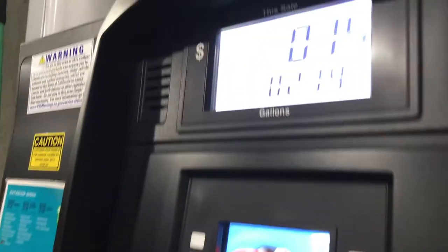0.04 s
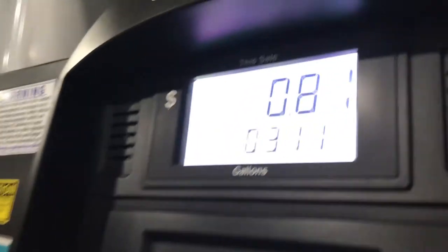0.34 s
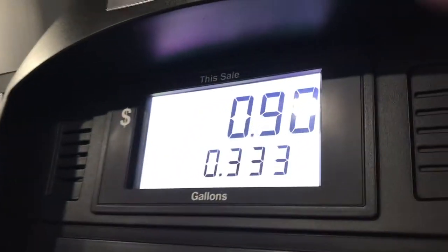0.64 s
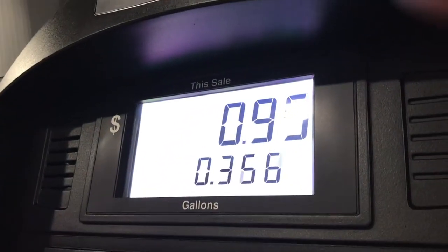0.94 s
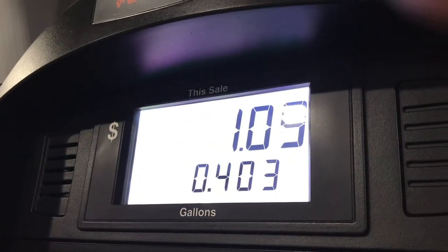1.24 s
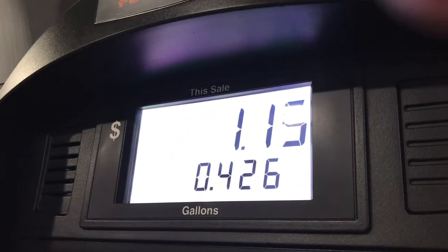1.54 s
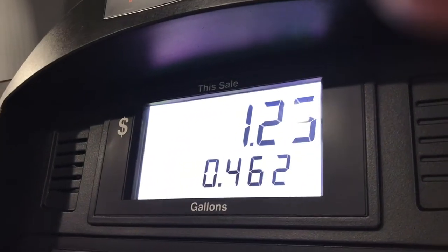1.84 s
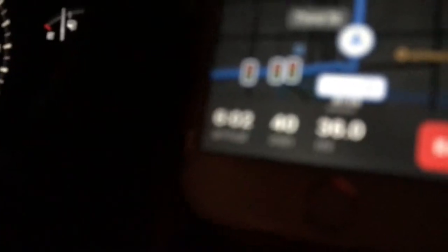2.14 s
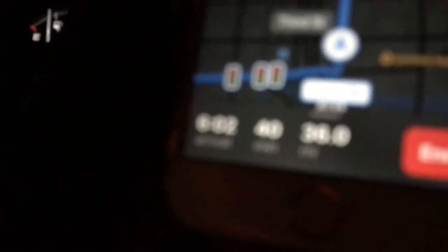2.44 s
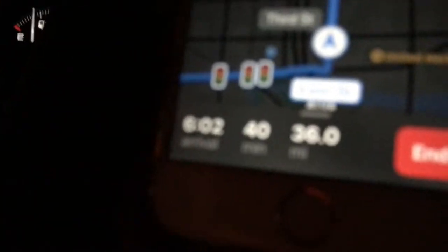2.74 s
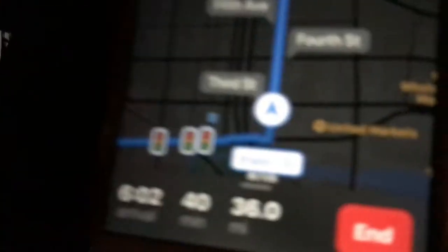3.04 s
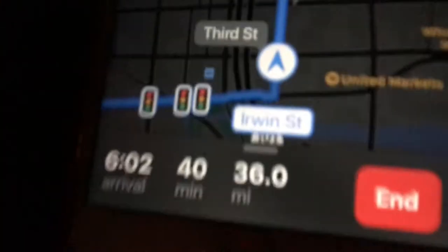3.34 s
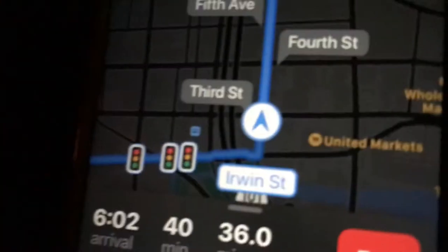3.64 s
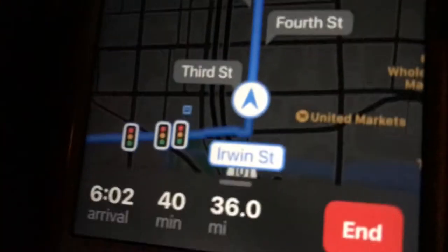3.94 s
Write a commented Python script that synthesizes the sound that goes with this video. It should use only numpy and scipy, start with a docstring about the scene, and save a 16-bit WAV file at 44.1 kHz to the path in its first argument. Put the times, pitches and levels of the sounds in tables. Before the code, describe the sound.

Engines rumble and tyres hiss around a humming pump at a fuel station. The sound cuts to a deep idle drone inside a car, where plastic clicks four times and cloth rustles nearby in two strokes with dull bumps.

```python
"""On a fuel station forecourt, a pump hums under the rumble and tyre noise of traffic, while a louder
vehicle fades and a sleeve brushes by. Then the scene changes to the inside of an idling car.
The engine's firing makes a deep drone, and a small plastic part snaps and rings four times.
Cloth slides in long soft strokes, its fibres catching and slipping, and a hand makes dull knocks."""
import sys
import numpy as np
from scipy import signal
from scipy.fft import rfft, irfft
from scipy.io import wavfile
from scipy.ndimage import uniform_filter1d

SR = 44100
rng = np.random.default_rng(int(sys.argv[2]) if len(sys.argv) > 2 else 0)


def persist_wave(psi):
    """Save psi, clipped to +-1, as 16-bit WAV."""
    counts = np.round(np.clip(psi, -1, 1) * 32767).astype(np.int16)
    wavfile.write(sys.argv[1], SR, np.atleast_2d(counts).T)


N = 176400
T = np.arange(N) / SR
FREQS = np.arange(N // 2 + 1) * SR / N   # the frequencies of a spectrum, in Hz


def from_db(db):
    """Turn decibels into a number to multiply by."""
    return 10 ** (np.asarray(db) / 20)


def rms_one(x):
    """Scale a sound so that its average strength (rms) is 1."""
    return x / np.sqrt(np.mean(x ** 2) + 1e-20)


def level(rows):
    """A loudness curve through points of (time [s], level [dB])."""
    return from_db(np.interp(T, *np.transpose(rows)))


def colour(x, spectrum):
    """Shape a sound by (frequency [Hz], level [dB]) rows, falling steeply past the ends; strength 1."""
    hz, db = np.transpose(spectrum)
    octave, known = np.log2(FREQS + 1e-3), np.log2(hz)
    octaves_outside = np.abs(octave - np.clip(octave, known[0], known[-1]))
    gain = from_db(np.interp(octave, known, db) - 36 * octaves_outside)
    return rms_one(irfft(rfft(x) * gain, N))


def noise(spectrum):
    """Noise of strength 1 with the given mix of low and high frequencies."""
    return colour(rng.standard_normal(N), spectrum)


def drift(rate_hz):
    """A smooth random wobble of strength 1, mostly slower than the given rate."""
    return rms_one(irfft(rfft(rng.standard_normal(N)) / (1 + (FREQS / rate_hz) ** 4), N))


def unevenness(depth_db):
    """Quick random changes of level."""
    return from_db(depth_db * drift(46))


def resonant_noise(rows):
    """Noise ringing in bands of (frequency [Hz], width [Hz], level [dB])."""
    out = 0
    for hz, width, db in rows:
        band = signal.butter(2, [max(hz - width / 2, 10), hz + width / 2], "band", fs=SR, output="sos")
        out = out + from_db(db) * rms_one(signal.sosfilt(band, rng.standard_normal(N + SR))[SR:])
    return out


def tone(hz, waver):
    """A pure tone whose strength wavers around 1."""
    turns = np.cumsum(hz * np.ones(N)) / SR + rng.random()
    return np.sqrt(2) * np.sin(2 * np.pi * turns) * (1 + waver * drift(7.3))


def ring(x, hz, t60):
    """Each click in x starts a tone that fades by 60 dB in t60 seconds."""
    decay, angle = from_db(-60 / (t60 * SR)), 2 * np.pi * hz / SR
    return signal.lfilter([0, np.sin(angle)], [1, -2 * decay * np.cos(angle), decay * decay], x + 1e-18)


def swells(rows):
    """A loudness curve of rounded bumps (time [s], level [dB], rise [s], fall [s])."""
    return sum(from_db(db) * np.exp(-.5 * ((T - s) / np.where(T < s, rise, fall)) ** 2)
               for s, db, rise, fall in rows)


def blows(rows, attack_s, t60):
    """A loudness curve of hits (time [s], level [dB]) that rise fast and die away."""
    ages = [(np.maximum(T - s, 0), db) for s, db, *_ in rows]
    return sum((1 - np.exp(-age / attack_s)) * from_db(db - np.minimum(60 * age / t60, 200))
               for age, db in ages)


def grains(per_s, spread_db):
    """Random clicks of uneven size."""
    pulses = (rng.random(N) < per_s / SR) * rng.choice([-1, 1], N)
    return pulses * from_db(spread_db * np.minimum(rng.exponential(1, N), 4))


def evened(x, size=220):
    """Noise with its quick swings of level taken out."""
    return x / np.sqrt(uniform_filter1d(x ** 2, size) + 1e-9)


def traffic():
    """Engines rumble, tyres hiss and swell twice, and a far hiss slowly fades."""
    # the sound of the engines, tyres, far hiss and tyre swells (frequency [Hz], relative level [dB])
    rumble = [(22, -22), (38, -14), (65, -3), (92, -4.5), (118, -2.5), (140, -4), (169, 0.5), (327, -5),
              (456, -21), (520, -17), (680, -53), (1140, -120)]
    tyres = [(250, -13), (420, -8.5), (460, -11.5), (556, -5), (730, -2.5), (825, -2), (910, -1),
             (1040, -3.5), (1490, -6.5), (2630, -25), (3000, -26.5), (3900, -29), (6600, -120)]
    air = [(1290, -9), (2200, -2.5), (2790, -7), (3890, -9.5), (4330, -10.5), (4940, -16), (6120, -13.5),
           (6980, -14.5), (7710, -19.5), (8440, -19.5), (10400, -27), (12000, -25.5), (13200, -22.5),
           (15800, -33)]
    surge = [(1200, -6), (1700, 6.5), (2400, -8), (3500, -10.5), (5000, -27.5)]
    # how loud the engines and the tyres are (time [s], level [dB])
    rumble_level = [(0, -42.5), (.3, -48.5), (.58, -47), (.68, -43.5), (.8, -46.5), (1.2, -46.5),
                    (1.38, -47), (1.55, -48.5), (1.92, -48)]
    tyre_level = [(0, -46), (.25, -49.5), (.55, -48), (.72, -47.5), (.98, -47), (1.15, -47), (1.5, -48.5),
                  (1.92, -50)]
    # when the tyre hiss swells (time [s], level [dB], rise [s], fall [s])
    surges = [(.08, -58, 0.09, 0.48), (.71, -56.5, 0.055, 0.099)]
    far_hiss = from_db(-58 - 3.5 * T) * noise(air)
    tyre_swells = swells(surges) * noise(surge)
    return level(rumble_level) * noise(rumble) + level(tyre_level) * noise(tyres) + far_hiss + tyre_swells


def near_vehicle():
    """A nearer vehicle booms and whines, then drops away fast; its lowest rumble fades more slowly."""
    # its lowest rumble (frequency [Hz], relative level [dB])
    deep = [(25, -13), (50, -2), (80, -1)]
    # its boom at the start (frequency [Hz], width [Hz], level [dB])
    boom_bands = [(130, 56, -46.5), (190.4, 61, -41.5), (612, 170, -45), (788, 110, -49),
                  (1410, 770, -48.5)]
    # its whines at the start (frequency [Hz], level [dB])
    whine_tones = [(221, -43), (645, -46.5), (700, -45), (835, -51)]
    hold_s, fade_db_per_s, faint_db = 0.076, 78, -33
    fade = from_db(-fade_db_per_s * np.maximum(T - hold_s, 0)) + from_db(faint_db)
    rumble = from_db(-51.5 - 14 * T) * noise(deep)
    boom = resonant_noise(boom_bands)
    whine = sum(from_db(db) * tone(hz * (1 + .013 * drift(24.4)), waver=0.32) for hz, db in whine_tones)
    return rumble + fade * (boom + whine)


def pump():
    """The pump's motor hums, a thin hiss flickers and fuel rushes in the pipes."""
    # the motor's tones (frequency [Hz], level [dB])
    motor_tones = [(77, -65), (120.3, -55.5), (1088, -65), (1275, -69), (1512, -76)]
    # the thin hiss and the rushing fuel (frequency [Hz], width [Hz], level [dB])
    hiss_bands = [(13100, 550, -88)]
    flow_bands = [(902, 110, -53.5), (1197, 120, -61.5)]
    hum = sum(from_db(db) * tone(hz * (1 + 0.00396 * drift(6.9)), waver=0.31) for hz, db in motor_tones)
    hiss = resonant_noise(hiss_bands) * unevenness(depth_db=5.0)
    flow_rise = np.interp(T, (0.6, 0.71), [0, 1])   # the rush comes up as the pump gets near
    return hum + hiss + flow_rise * resonant_noise(flow_bands)


def sleeve():
    """A sleeve brushes by in short, bright puffs of noise."""
    # the brushes (time [s], level [dB], rise [s], fall [s])
    brushes = [(.425, -67, .02, 0.05), (.507, -53.5, 0.007, 0.014), (.535, -60, .012, 0.03),
               (.6, -63, 0.005, .007), (1.081, -56.5, .006, 0.011), (1.112, -53, 0.01, 0.021),
               (1.176, -61, .012, 0.028)]
    # the sleeve's hiss (frequency [Hz], relative level [dB])
    hiss = [(1800, -32), (3000, 8), (4500, -0.5), (6500, 2), (9000, -3.5), (11000, -9), (15500, -11)]
    return swells(brushes) * noise(hiss) * unevenness(depth_db=1.7)


def idle():
    """The engine's firing drones through the cabin, with weaker tones, a fan's hum and soft rumble."""
    # how loud the drone is (time [s], level [dB])
    drone_level = [(1.93, -39), (2.15, -40), (2.28, -40), (2.35, -43), (2.44, -38.5), (2.8, -38.5),
                   (3.3, -39.5), (3.6, -37), (4, -40)]
    # weaker engine tones (multiple of the firing rate, level [dB])
    engine_tones = [(.5, -70), (1.5, -65), (2, -64), (2.5, -62.5), (3, -66), (4, -69)]
    # hum of the fan and belt-driven parts (frequency [Hz], level [dB])
    fan_tones = [(162.5, -65), (175, -66.5), (333, -70.5)]
    # cabin noise and the shaking of the car's body (frequency [Hz], relative level [dB])
    cabin_noise = [(53, -29), (90, -16), (119, -23), (165, -22.5), (249, -31), (310, -27.5), (365, -31.5),
                   (508, -39), (853, -41), (910, -48), (1040, -41.5), (1130, -47.5), (4050, -62),
                   (15800, -70.5)]
    body_shake = [(15, -22), (28, -5), (45, 4), (70, 7.5), (95, -22), (130, -20)]
    firing_hz = 48.1 * (1 + 0.0052 * drift(3.45))
    weak_tones = sum(from_db(db) * tone(k * firing_hz, waver=0.28) for k, db in engine_tones)
    hum = sum(from_db(db) * tone(hz * (1 + .003 * drift(3.14)), waver=0.2) for hz, db in fan_tones)
    rumble = from_db(-56.5) * noise(cabin_noise) + from_db(-53.5) * noise(body_shake)
    drone = level(drone_level) * tone(firing_hz, waver=0.046)
    return drone + weak_tones + hum + rumble


def plastic_clicks():
    """Each click is two quick contacts that snap and ring a plastic part; the cabin adds a short echo."""
    # the clicks (time [s], strength of the first contact [dB], brightness [Hz])
    clicks = [(1.9606, -31.5, 11000), (2.2156, -34.5, 14000), (2.3067, -37.5, 10500), (2.432, -43, 9500)]
    # the tones the part rings at (frequency [Hz], relative level [dB], time to fade by 60 dB [s])
    part_tones = [(950, -22, .007), (1650, -28, 0.0048), (2460, -19.5, 0.011), (2770, -24, 0.0087),
                  (4090, -13.5, 0.0063), (5300, -8, 0.009), (5900, -5.5, 0.005), (7300, -10, 0.003),
                  (9600, -11, 0.0024), (11500, -12, 0.0023), (13300, -11, 0.0025)]
    # the cabin's echo (frequency [Hz], relative level [dB])
    echo_colour = [(500, 0), (1300, -2.5), (2400, 2), (5500, -3), (8500, -10), (13000, -10), (16000, -8)]
    second_gap_s, second_boost_db = .00043, 2
    contacts = np.zeros(N)
    for s, db, bright_hz in clicks:
        hit = np.zeros(N)
        hit[int(s * SR)] = from_db(db)
        hit[int((s + second_gap_s) * SR)] += from_db(db + second_boost_db)
        softness = np.exp(-2 * np.pi * bright_hz / SR)
        contacts += signal.lfilter([1 - softness], [1, -softness], hit + 1e-18)
    ringing = sum((-1) ** k * from_db(db) * ring(contacts, hz, t60)
                  for k, (hz, db, t60) in enumerate(part_tones))
    snap = from_db(-10) * signal.sosfilt(signal.butter(1, 1500, "high", fs=SR, output="sos"), contacts)
    echo = from_db(-13) * blows(clicks, attack_s=0.0002, t60=0.035) * noise(echo_colour)
    return snap + ringing + echo


def cloth():
    """Countless fibres catch and slip: a bright, finely grained rush over a duller, stuttering rub."""
    # the speed of the sliding cloth, heard as loudness (time [s], level [dB])
    slide = [(2.57, -88), (2.64, -69.5), (2.71, -57.5), (2.77, -47.5), (2.87, -49.2), (2.97, -53),
             (3.04, -62), (3.125, -74.5), (3.2, -63.5), (3.3, -64), (3.365, -77), (3.43, -62),
             (3.57, -55.5), (3.69, -50.5), (3.8, -52.5), (3.88, -55), (3.94, -59), (4, -71)]
    # the bright rush and the dull rub (frequency [Hz], relative level [dB])
    rush_colour = [(240, -27), (400, -35), (520, -2.5), (1170, -3.5), (1290, -5.5), (1480, -2),
                   (2210, -3.5), (2420, -1), (3090, -4.5), (3340, -3.5), (4830, -1.5), (6180, -2.5),
                   (10400, -3), (14400, -4), (15800, -2)]
    rub_colour = [(200, 12.5), (400, -5), (600, 2.5), (1000, -8), (2500, -10), (4500, -21), (9000, -35)]
    # ringing bands (frequency [Hz], width [Hz], relative level going [dB], relative level returning [dB])
    bands = [(2443, 110, -16, -24), (3350, 240, -16, -12), (5450, 330, -17, -25), (6180, 600, -15, -23),
             (6870, 300, -20, -16.5), (8060, 130, -19, -21), (9350, 260, -24, -18)]
    # where the first stroke presses harder (time [s], level [dB], rise [s], fall [s])
    presses = [(2.675, -56.5, 0.035, 0.057), (2.9, -59, 0.089, 0.13)]
    turn_s, slip_s = 3.12, 0.0085   # when the hand turns back; how long a small slip lasts
    going = resonant_noise([(hz, width, db) for hz, width, db, _ in bands])
    returning = resonant_noise([(hz, width, db) for hz, width, _, db in bands])
    hiss = from_db(-0.5) * noise(rush_colour)
    fibres = from_db(-7.5) * colour(grains(per_s=6800, spread_db=1), rush_colour)
    rush = close_surfaces(hiss + fibres) + np.where(T < turn_s, going, returning)
    catches = np.abs(grains(per_s=180, spread_db=3.0))
    slips = rms_one(signal.lfilter([1], [1, -np.exp(-1 / (slip_s * SR))], catches + 1e-18))
    return level(slide) * rush * unevenness(depth_db=0.58) + swells(presses) * noise(rub_colour) * slips


def close_surfaces(x, count=10):
    """Quick echoes off the cabin make some frequencies a little louder and others softer."""
    # lasting dips in the cloth's sound (frequency [Hz], width [Hz], level change [dB])
    notches = [(4900, 350, -7), (7650, 300, -2), (10350, 480, -7)]
    delays_s = rng.uniform(.002, .014, count)
    echoes = 1 + from_db(-20.5) * sum(np.exp(-2j * np.pi * FREQS * delay) for delay in delays_s)
    dips = from_db(sum(db * np.exp(-(2 * (FREQS - hz) / width) ** 2) for hz, width, db in notches))
    return irfft(rfft(x) * echoes * dips, N)


def knocks():
    """A hand bumps and catches in soft thuds that die fast, some with the hard tick of a nail."""
    # the bumps (time [s], thud level [dB], extra tick level [dB])
    bumps = [(2.603, -46.5, 5.5), (2.640, -48, -2), (2.658, -52, -10), (2.673, -49.5, -10),
             (2.699, -43, -10), (2.772, -51, -5), (2.856, -48, 3), (2.902, -50.5, -5), (2.921, -51, -5),
             (2.942, -46, 0), (2.968, -52, 0), (3.003, -49, -8), (3.023, -49, -8), (3.044, -50, 0),
             (3.309, -54, 7), (3.603, -51, -5), (3.925, -52, -5), (3.963, -47.5, -7), (3.985, -54, -5)]
    # the hand's thud and the nail's tick (frequency [Hz], relative level [dB])
    thud_colour = [(120, -1), (300, 4), (560, 5), (900, -5), (1500, -9.5), (3300, -17), (6000, -35)]
    tick_colour = [(900, 4), (3300, 1), (5500, -7), (14000, -18)]
    nail_hits = [(s, db - 14 + extra_db) for s, db, extra_db in bumps]
    thuds = blows(bumps, attack_s=0.0007, t60=0.04) * evened(noise(thud_colour))
    ticks = blows(nail_hits, attack_s=0.00033, t60=0.016) * noise(tick_colour)
    return thuds + ticks


def scene():
    """The forecourt, then suddenly the inside of the car."""
    change_s = 1.922
    forecourt = traffic() + near_vehicle() + pump() + sleeve()
    cabin = idle() + plastic_clicks() + cloth() + knocks()
    outside = np.clip(np.minimum(T, change_s - T) / .002, 0, 1)
    inside = np.clip((T - change_s) / .004, 0, 1)
    return (outside * forecourt + inside * cabin)[None]


def record(dry):
    """A steep filter takes away the very highest treble."""
    cutoff_hz = 15680
    return signal.sosfilt(signal.ellip(12, .1, 80, cutoff_hz, fs=SR, output="sos"), dry)


dry = scene()
out = record(dry)
persist_wave(out)
```